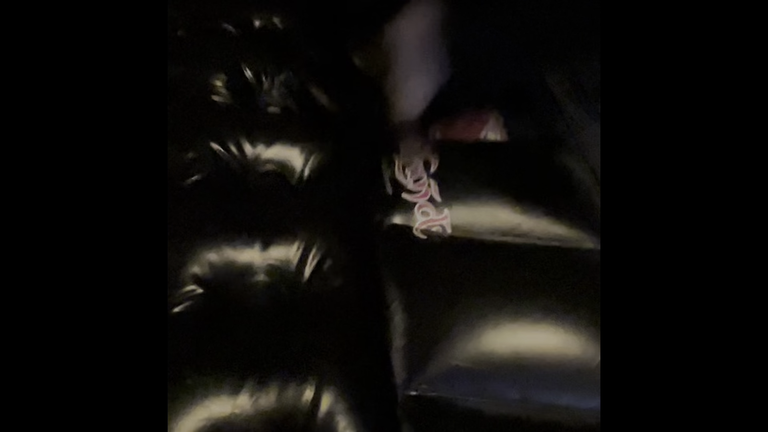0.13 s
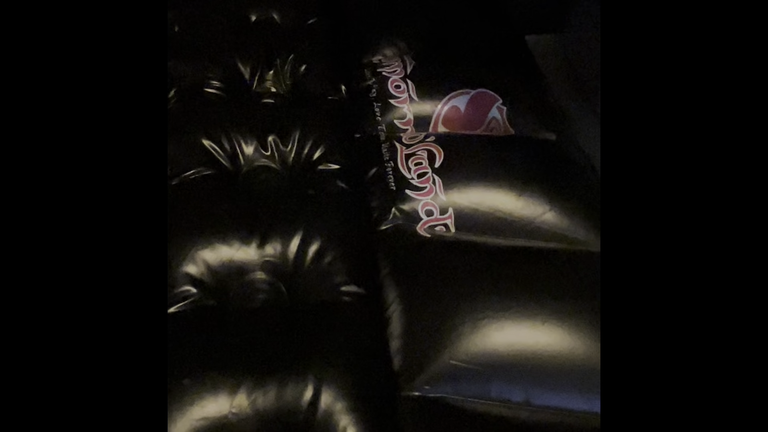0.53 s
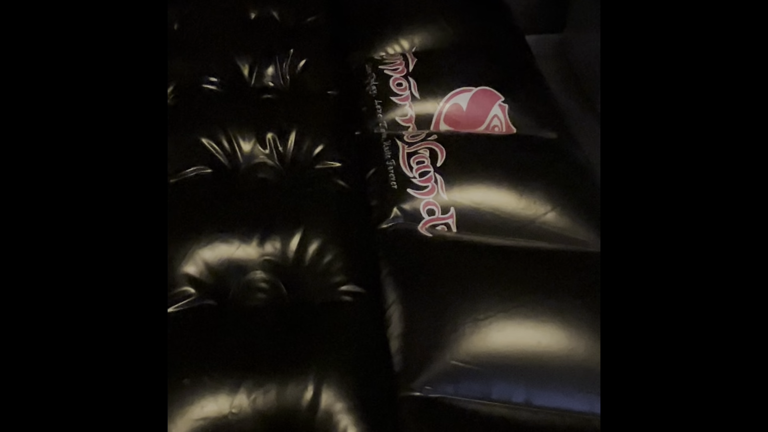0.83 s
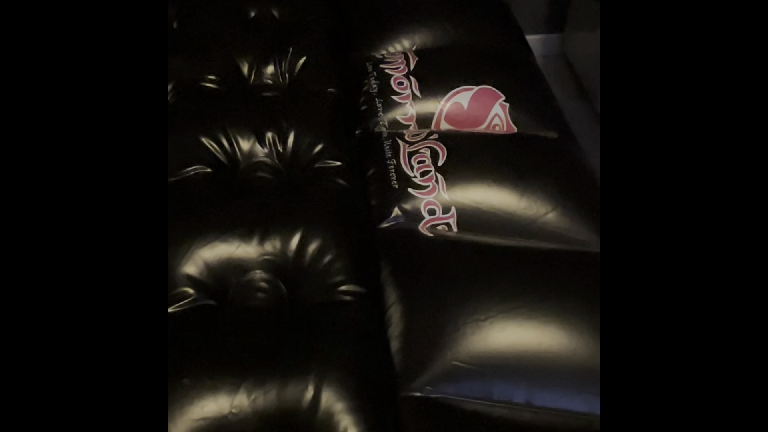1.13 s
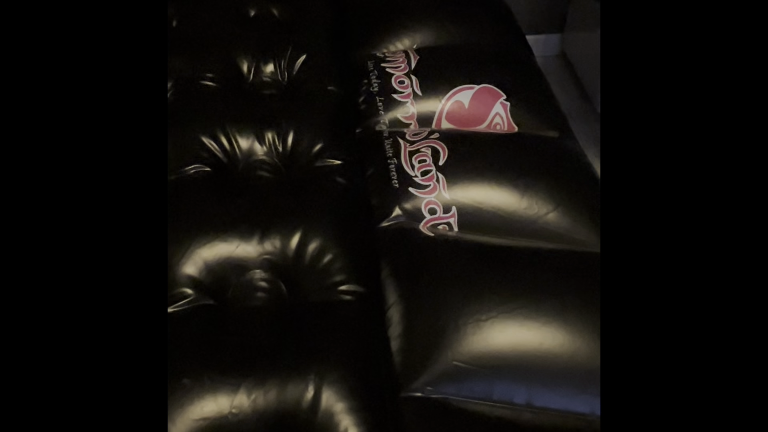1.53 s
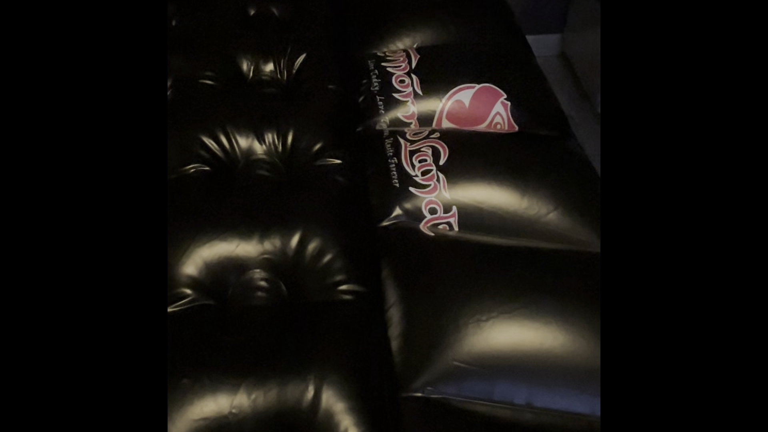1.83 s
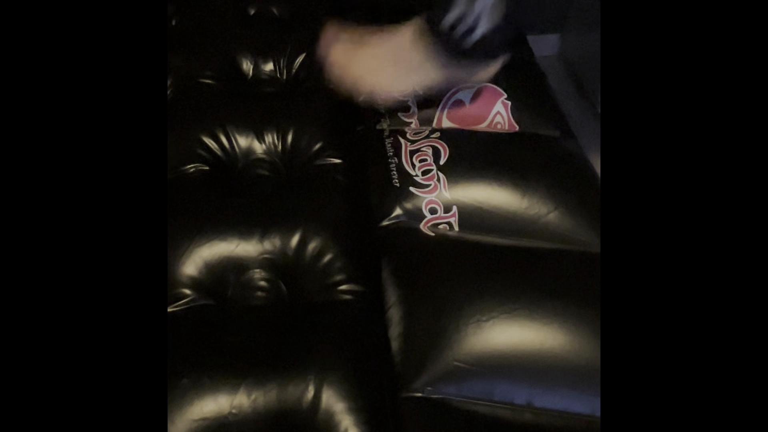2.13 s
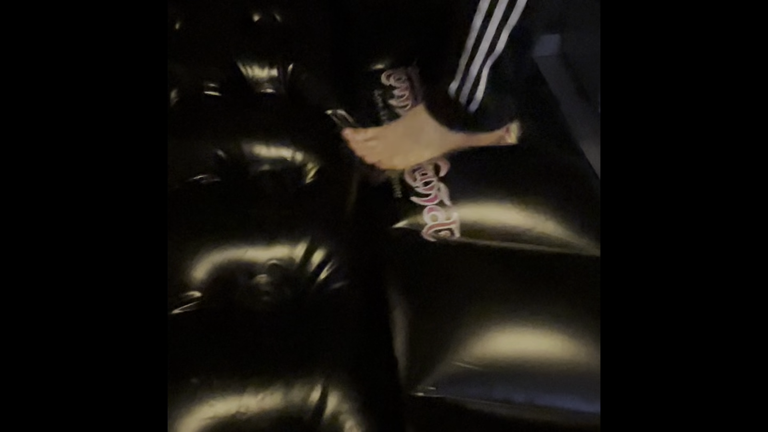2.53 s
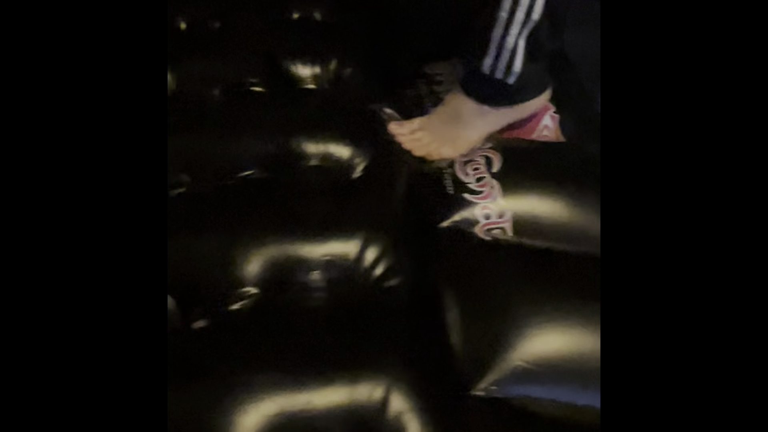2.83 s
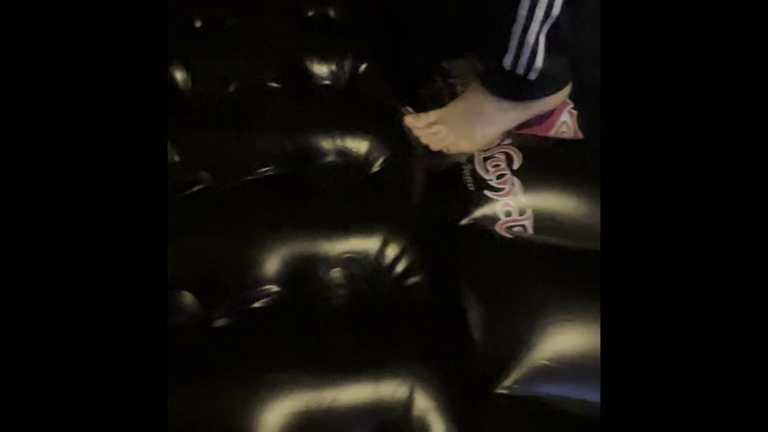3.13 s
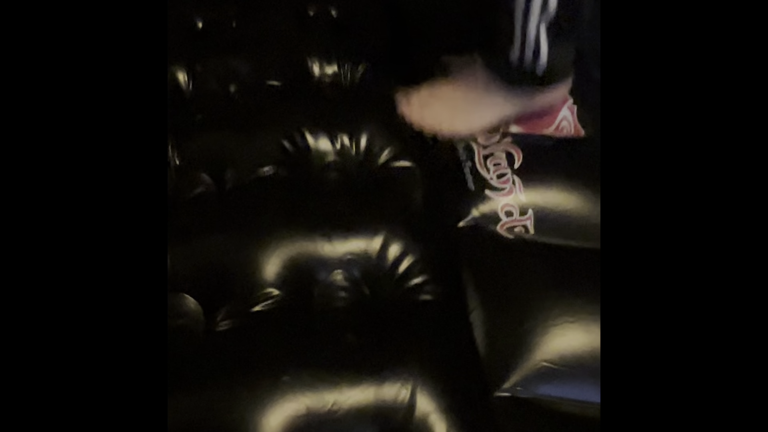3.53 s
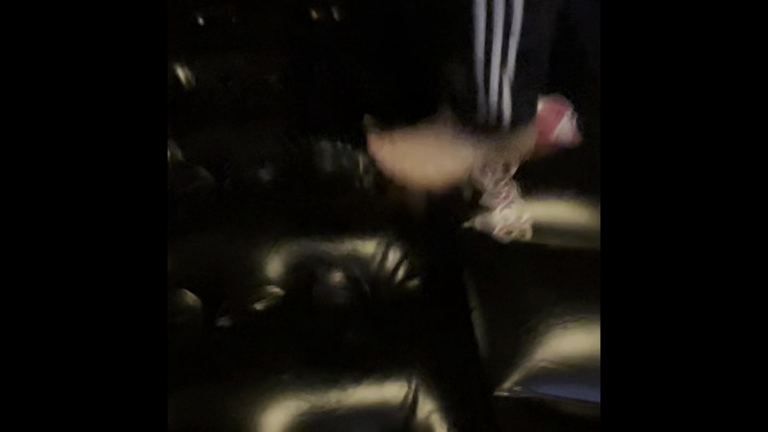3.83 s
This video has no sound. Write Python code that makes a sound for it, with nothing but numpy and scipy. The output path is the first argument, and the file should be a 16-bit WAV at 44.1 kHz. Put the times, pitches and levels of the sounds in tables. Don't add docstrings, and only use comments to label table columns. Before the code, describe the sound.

Bare foot thumps, rubs and squeaks on a vinyl air mattress in a small quiet room

```python
import sys
import numpy as np
from scipy import signal
from scipy.fft import rfft, irfft
from scipy.io import wavfile
from scipy.ndimage import uniform_filter1d

SR = 44100
rng = np.random.default_rng(int(sys.argv[2]) if len(sys.argv) > 2 else 0)


def invert_db(x):
    u = np.asarray(x, float) / 20
    return 10 ** u


def to_wav(sig):
    pcm = np.clip(np.atleast_2d(sig), -1, 1) * 32767
    pcm = np.round(pcm).astype(np.int16)
    wavfile.write(sys.argv[1], SR, pcm.T)


N = 176400


def rms_one(x):
    return x / np.sqrt(np.mean(x ** 2) + 1e-20)


def evened(x):
    window_s = .12
    return x / np.sqrt(uniform_filter1d(x ** 2, size=int(window_s * SR)) + 1e-12)


def colour(x, points):
    hz, db = np.transpose(points)
    edge = 4000
    wide = np.pad(x, edge, mode="reflect")
    grid = np.maximum(np.fft.rfftfreq(len(wide), 1 / SR), 1)
    gain = invert_db(np.interp(np.log(grid), np.log(hz), db))
    return irfft(rfft(wide) * gain, len(wide))[edge:-edge]


def drift(rate_hz):
    return np.interp(np.arange(N) / SR * rate_hz, np.arange(1000), rng.standard_normal(1000))


def grains(per_s, spread_db):
    sizes = invert_db(spread_db * np.minimum(rng.exponential(1, N), 4)) * rng.choice([-1, 1], N)
    return rms_one(sizes * (rng.random(N) < per_s / SR))


def ring(x, hz, t60):
    r, w = invert_db(-60 / (t60 * SR)), 2 * np.pi * hz / SR
    return signal.lfilter([0, np.sin(w)], [1, -2 * r * np.cos(w), r * r], x + 1e-18)


def swells(rows):
    step = 16
    t = np.arange(0, N, step)[:, None] / SR
    peak_s, rise_s, fall_s, first_db, second_db = np.transpose(rows)
    distance = np.where(t < peak_s, (peak_s - t) / rise_s, (t - peak_s) / fall_s)
    shape = invert_db(-20 * distance ** 1.3)
    first = np.sum((shape * invert_db(first_db)) ** 2, axis=1)
    second = np.sum((shape * invert_db(second_db)) ** 2, axis=1)
    return np.repeat(np.sqrt([first, second]), step, axis=1)


def timeline():
    return np.zeros(N + SR)


def place(out, start, sound):
    out[start:start + len(sound)] += sound


# frequency in Hz, level in dB.
ROOM_TONE = [(20, -30), (60, -10), (183, -2.5), (400, -12), (500, -9.5), (700, -20), (7500, -43),
             (16000, -46.5)]


def room_tone():
    return invert_db(-55) * rms_one(colour(rng.standard_normal(N), ROOM_TONE))


def room(x):
    t60_s, cut_hz, first_echo_s = .45, 2500, .004
    t = np.arange(SR) / SR
    tail = rng.standard_normal(SR) * invert_db(-60 * t / t60_s) * (t > first_echo_s)
    tail = signal.sosfilt(signal.butter(1, cut_hz, fs=SR, output="sos"), tail)
    return signal.fftconvolve(x, tail / np.sqrt(np.sum(tail ** 2)))[:N]


def friction(level, spectrum):
    grit = .3 * grains(per_s=3500, spread_db=2.5)
    near = colour(grit + rng.standard_normal(N), spectrum)
    far = colour(grit + rng.standard_normal(N), spectrum)
    roughness_db = 1.5 * drift(60)
    return level * invert_db(1.3 + roughness_db) * rms_one(np.array([near, far]))


# peak in seconds, rise in seconds,
# fall to -20 dB in seconds, rub level in dB, swish level in dB.
STROKES = [(.04, .3, .2, -44, -49), (.115, .08, .09, -42.5, -46), (.178, .02, .13, -43, -45),
           (.262, .02, .18, -46, -64), (.62, .15, .2, -68, -72), (.77, .1, 0.24, -69, -71),
           (.88, .1, .22, -62, -57), (1.36, .1, 0.19, -60, -63), (1.49, .1, 0.1, -66, -64.5),
           (1.83, .05, 0.7, -76, -76), (2.05, .1, 0.4, -70, -72), (2.182, .006, 0.15, -43, -45),
           (2.23, .06, .24, -46, -56), (2.72, .14, .12, -46, -56), (2.79, .2, .2, -42, -51),
           (3.11, .16, .2, -46, -56), (3.3, .1, 0.11, -60, -73), (3.46, .08, .1, -59, -67),
           (3.518, .05, .05, -54, -51), (3.57, .1, .12, -61, -62), (3.68, .15, .1, -68, -73),
           (3.768, .005, .12, -46, -50), (3.84, .1, .2, -49, -53)]
# frequency in Hz, level in dB per Hz.
RUB = [(120, -30), (400, -2), (750, -4), (1450, -8), (2400, -7.5), (4000, -17), (8000, -25), (16000, -40)]
# frequency in Hz, level in dB per Hz.
SWISH = [(600, -50), (2000, -7.5), (2600, -3), (4850, -3.5), (6800, -2), (11200, -8), (16000, -11)]


def strokes():
    rub, swish = swells(STROKES)
    return friction(rub, RUB) + friction(swish, SWISH)


# start in seconds, peak in dB, burst length in seconds.
TICKS = [
    (2.1772, -32, .004),
    (2.183, -24, .004),
    (3.7652, -33, .005),
    (3.514, -43, .07),
    (3.536, -49, .05),
    (3.4145, -52, .004),
]
# frequency in Hz, level in dB.
TICK_COLOUR = [(1000, -14), (5000, -5), (11500, 0), (13000, -14), (16000, -21)]


def ticks():
    out, t = timeline(), np.arange(3000) / SR
    for s, db, t60 in TICKS:
        place(out, int(s * SR), invert_db(db - 60 * t / t60) * rng.standard_normal(3000))
    return colour(out[:N], TICK_COLOUR)


# start in seconds, level in dB, pitch in Hz, length in seconds.
SQUEAKS = [
    (2.181, -41, 2760, .017),
    (2.2, -50, 2500, .012),
    (3.766, -48, 2950, .014),
    (3.785, -47, 3050, .02),
    (3.505, -52, 2900, .015),
    (3.876, -53, 2990, .015),
    (.698, -57, 2900, .008),
    (.698, -55, 2000, .008),
    (1.011, -55, 2250, .007),
    (1.027, -58, 2200, .007),
]


def squeaks():
    cycles, edge_s, settle = 45, .002, 2000
    out, t = timeline(), np.arange(3000) / SR
    for s, db, hz, length in SQUEAKS:
        held = np.clip(t / edge_s, 0, 1) * np.exp(-np.maximum(t - length, 0) / edge_s)
        tone = ring(rng.standard_normal(5000), hz, cycles / hz)[settle:]
        place(out, int(s * SR), invert_db(db) * held * rms_one(tone))
    return out[:N]


# start in seconds, peak in dB, pitch in Hz, ring in seconds.
SNAPS = [(.058, -33, 3000, .012), (.1065, -29, 2400, .012), (.115, -29, 2900, .03), (.167, -27, 2600, .015),
         (.176, -27, 4500, .01), (.187, -30.5, 3500, .01), (.699, -51, 2600, .02), (.826, -50, 8000, .03),
         (1.012, -52, 2600, .02), (1.114, -53, 8000, .008), (1.894, -42.5, 1800, .008),
         (2.177, -30.5, 9000, .008), (2.021, -52, 3500, .15), (2.021, -56, 7800, .1),
         (2.071, -50, 10600, .15), (.005, -32, 1500, .01), (.017, -36, 2600, .012),
         (2.7062, -36, 2030, .012), (2.182, -33, 1100, .02), (.263, -22, 1050, .16), (.246, -26, 1000, .07),
         (.2415, -35, 1500, .012), (.259, -30, 1700, .015), (3.515, -44, 3300, .04),
         (2.455, -47, 1800, .01), (3.324, -53.5, 10000, .008), (3.401, -53, 1600, .01),
         (3.415, -56, 10000, .008), (3.422, -52, 10500, .008), (3.765, -34, 2600, .03),
         (3.797, -42, 7000, .01), (3.774, -38, 10500, .01), (3.878, -38, 8000, .01)]


def snaps():
    out, t = timeline(), np.arange(3000) / SR
    for s, db, hz, t60 in SNAPS:
        noise = rng.standard_normal(3000)
        burst = rms_one(ring(noise, hz, 13.0 / hz)) + .15 * noise
        place(out, int(s * SR), invert_db(db - 7 - 60 * t / t60) * burst)
    return out[:N]


# centre in seconds, peak in dB, width in seconds.
SLUMPS = [(.0362, -23, .0012), (.048, -22, .002), (.0645, -18, .002), (.076, -18, .002), (.0935, -20, .002),
          (.1015, -24, .0014), (.119, -22, .0018), (.1722, -19, .0016), (.192, -21, .0016),
          (2.2142, -23, .0011), (2.2405, -26, .002), (2.2592, -23, .0012), (2.276, -29, .0015),
          (2.295, -28, .0016), (3.471, -33, .0016), (3.512, -31, .002), (3.5305, -31, .002),
          (3.543, -31, .0016), (3.8005, -25, .0018), (3.854, -25, .0014), (3.865, -25, .0014),
          (3.906, -28, .0015)]


def slumps():
    rebound, half = .6, 600
    out, t = timeline(), (np.arange(2 * half) - half) / SR
    for s, db, width in SLUMPS:
        u = (t / width) ** 2
        place(out, int(s * SR) - half, -invert_db(db) * (1 - rebound * u) * np.exp(-u / 2))
    return out[:N]


# pitch in Hz, level in dB, 60 dB decay in seconds.
CHAMBERS = [(111, 0, .1), (167, 0, .1), (245, -3, .07), (300, -8, .04), (347, -6.5, .05), (417, -2.5, .06),
            (478, -6, .05), (576, -8, .04), (680, -11, .04), (830, -13, .03), (1040, -14, .03)]


def chambers(x):
    return sum((-1) ** k * invert_db(db) * ring(x, hz, t60) for k, (hz, db, t60) in enumerate(CHAMBERS))


# start in seconds, peak in dB, pitch in Hz, cycles of ring.
POPS = [(.167, -22, 350, 6), (.2419, -14.5, 270, 4.5), (.2592, -11, 320, 5.5), (.382, -33, 353, 6),
        (.703, -43, 470, 6), (1.37, -34, 330, 4.5), (1.515, -47, 390, 7), (1.894, -35, 350, 5),
        (2.179, -33, 400, 5), (.005, -30, 600, 4), (.021, -28, 400, 4), (.2685, -23, 300, 5),
        (.283, -23, 330, 5), (2.388, -38, 400, 6), (2.456, -37, 380, 6), (2.978, -40, 205, 4),
        (3.316, -38, 405, 6), (3.72, -42, 250, 5), (2.767, -34, 345, 5), (3.461, -37, 300, 4),
        (3.8325, -23, 240, 6), (3.88, -31, 330, 6)]
# frequency in Hz, level in dB.
SLAP = [(150, -30), (600, -3), (1100, 0), (2200, -8), (4000, -28)]


def pops():
    sweep, sweep_s, attack_s = 2.4, .0013, .0014
    slap_db, slap_t60_s = -3, .022
    direct, slaps, t = timeline(), timeline(), np.arange(4000) / SR
    for s, db, hz, cycles in POPS:
        turns = hz * (t + sweep * sweep_s * (1 - np.exp(-t / sweep_s)))
        shape = invert_db(db + 2.5 - 60 * (t * hz / cycles) ** 1.7) * (1 - np.exp(-t / attack_s))
        place(direct, int(s * SR), -shape * np.sin(2 * np.pi * turns))
        slap = invert_db(db + slap_db - 60 * t / slap_t60_s) * rng.standard_normal(4000)
        place(slaps, int(s * SR), slap)
    return direct[:N] + colour(slaps[:N], SLAP) + invert_db(-47) * chambers(direct[:N])


# peak in seconds, rise in seconds,
# fall to -20 dB in seconds, chamber level in dB, floor thud level in dB.
HEAVES = [(.075, .15, .12, -27, -30), (.12, .05, .08, -30, -36), (.18, .03, .15, -29, -36),
          (.275, .04, .14, -29, -33), (.43, .1, .12, -46, -42), (.6, .15, .4, -54, -52),
          (.8, .1, .2, -54, -53), (1.08, .1, .2, -58, -56), (1.33, .05, .15, -50, -50),
          (1.57, .08, .12, -58, -53), (2.1, .1, .15, -54, -52), (2.19, .015, .34, -32, -40),
          (2.32, .1, .15, -38, -40), (2.52, .15, .2, -47, -48), (2.7, .2, .2, -40, -48),
          (2.82, .15, .25, -41, -50), (2.96, .05, .15, -46, -46), (3.09, .15, .25, -43, -50),
          (3.24, .1, .15, -47, -43), (3.32, .06, .08, -44, -52), (3.5, .15, .12, -37, -45),
          (3.84, .12, .2, -31, -40), (3.92, .1, .15, -37, -37), (3.99, .08, .2, -43, -35)]


def boom():
    air, floor = swells(HEAVES)
    band = signal.butter(2, [70, 1300], "band", fs=SR, output="sos")
    lumps = signal.sosfilt(band, grains(per_s=300, spread_db=3.0))
    direct = rms_one(ring(lumps, hz=340, t60=.006))
    body = evened(rms_one(chambers(lumps)) + invert_db(-3) * direct)
    thud = evened(ring(rng.standard_normal(N), hz=62, t60=.22))
    flicker_db = 3 * drift(25)
    return invert_db(-.9 + flicker_db) * air * body + invert_db(-3.5) * floor * thud


# frequency in Hz, level in dB.
PORT_SUM = [(30, -12), (45, 0), (10500, 0), (12000, -6), (13000, -22), (16000, -30)]
# frequency in Hz, level in dB against the source.
PORTS = [(40, -56), (250, -20), (900, -1.5), (1500, -6), (1950, -20), (2900, -.4), (5200, -1.5),
         (6900, -24), (8200, 1.5)]
# frequency in Hz, level in dB.
DIFFUSE = [(200, -3), (3000, 2.5), (12000, -12)]
# frequency in Hz, level in dB against the sum.
LEAN = [(30, -44), (300, -21), (700, -30), (1500, -50)]


def ports(x, other):
    edge = 4000
    quarter = signal.hilbert(np.pad(x, edge, mode="reflect")).imag[edge:-edge]
    mid = colour(x, PORT_SUM)
    side = colour(colour(other, DIFFUSE) + invert_db(-5) * quarter, PORTS)
    side = side - colour(mid, LEAN)
    return np.array([mid + side, mid - side])


def scene():
    near, far = strokes()
    hits = pops() + snaps() + slumps()
    low = boom()
    send = invert_db(-15) * hits + invert_db(-14) * low + invert_db(-12) * near
    heard = ports(low + hits + near + room(send) + room_tone(), far + room(send) + room_tone())
    chirps = ports(squeaks(), np.zeros(N))
    tick_balance = invert_db(np.array([[1.1], [-1.1]]))
    return heard + chirps + ticks() * tick_balance


def roll_off(x):
    return signal.sosfilt(signal.butter(12, 15800, fs=SR, output="sos"), x)


def record(dry):
    return roll_off(dry)


dry = scene()
out = record(dry)
to_wav(out)
```